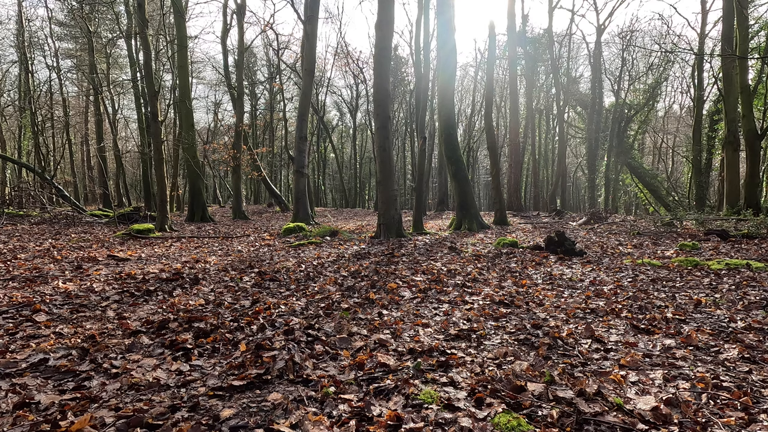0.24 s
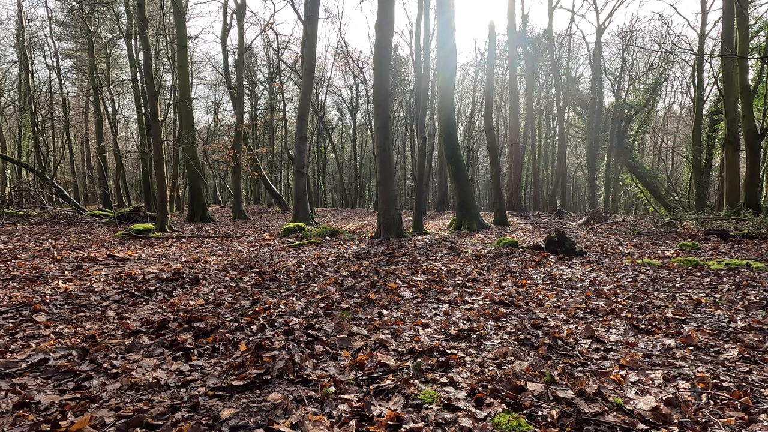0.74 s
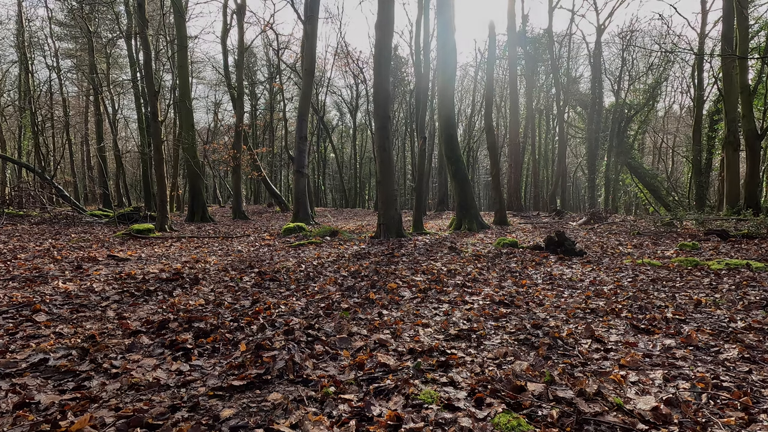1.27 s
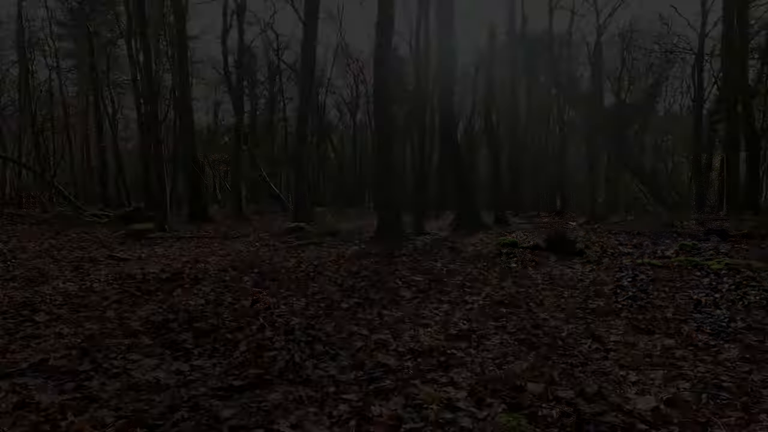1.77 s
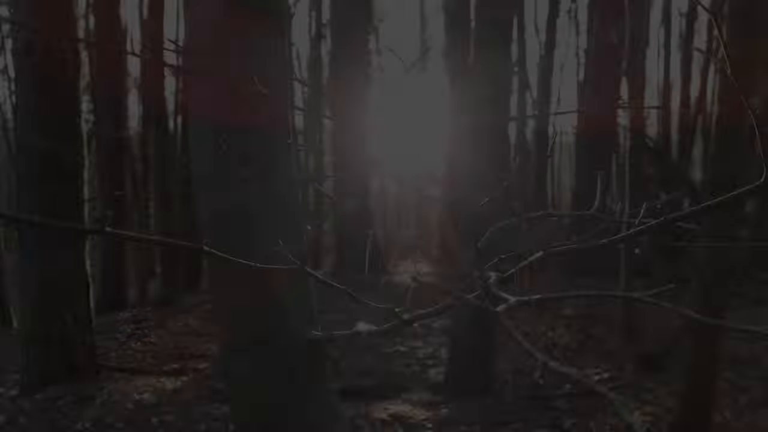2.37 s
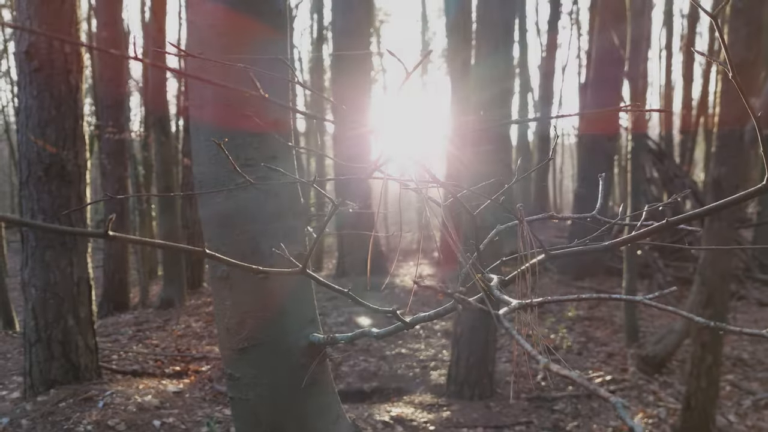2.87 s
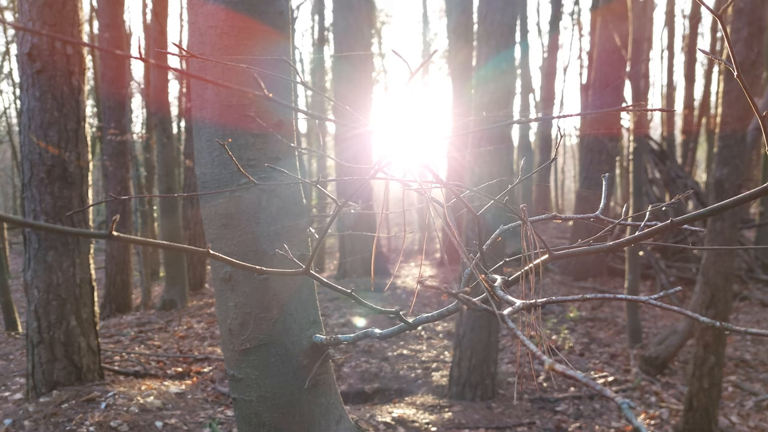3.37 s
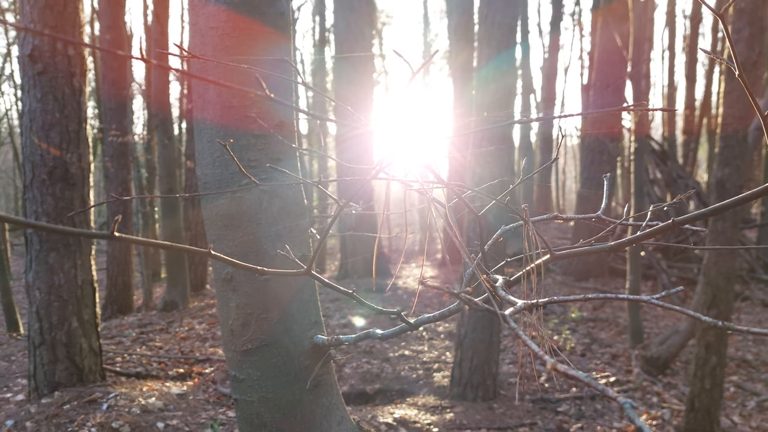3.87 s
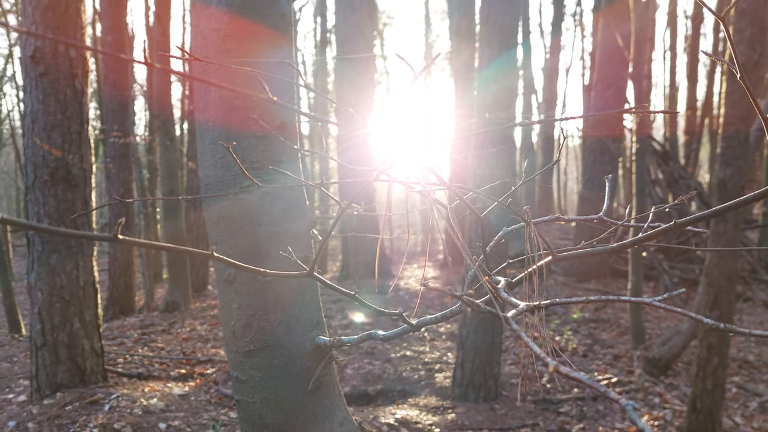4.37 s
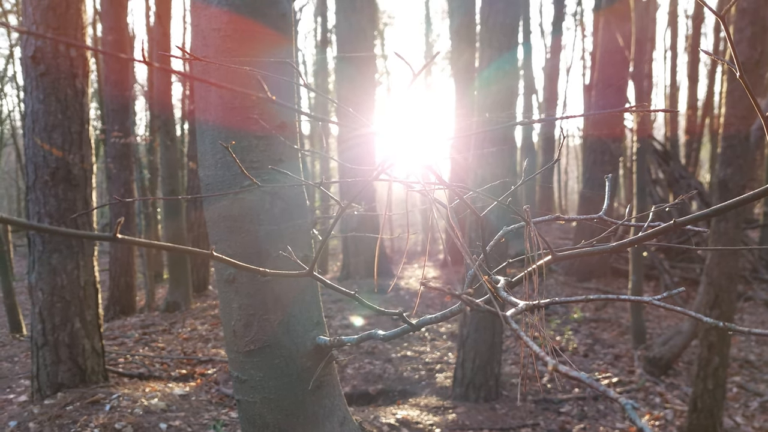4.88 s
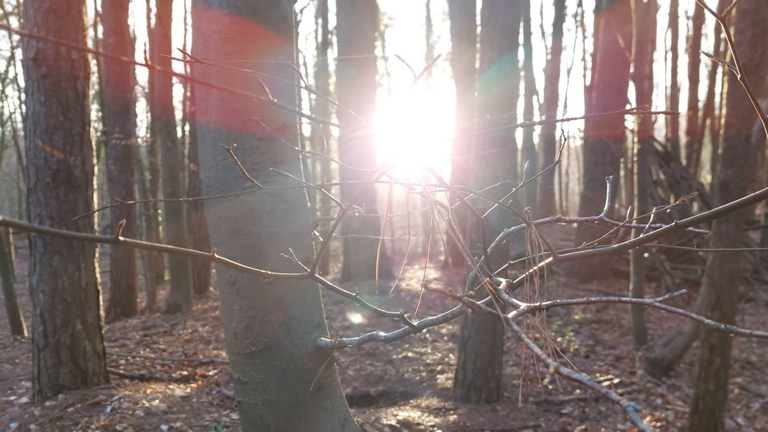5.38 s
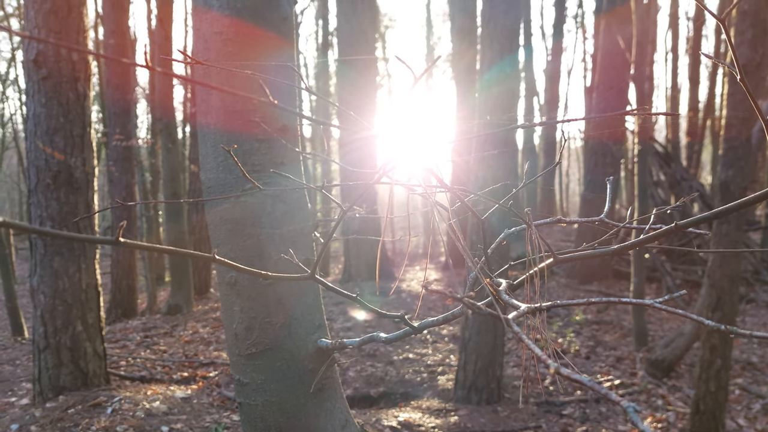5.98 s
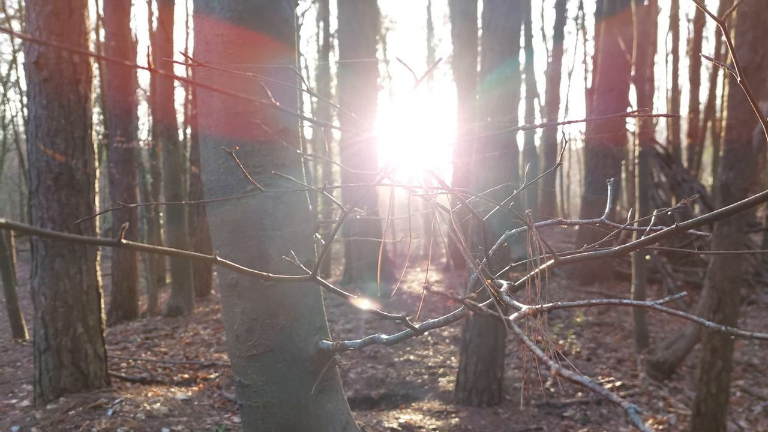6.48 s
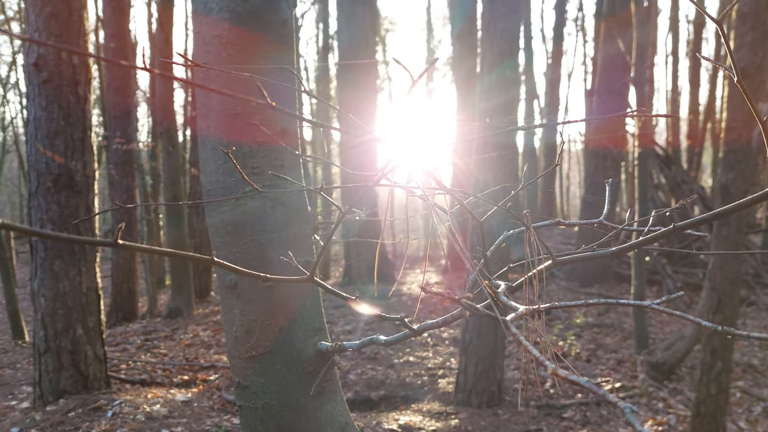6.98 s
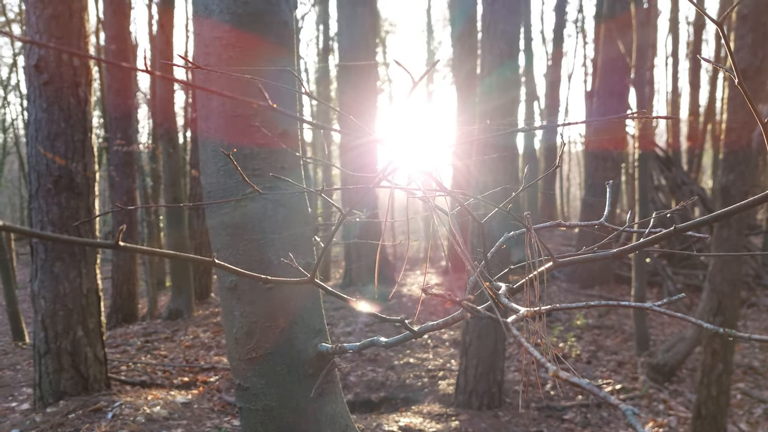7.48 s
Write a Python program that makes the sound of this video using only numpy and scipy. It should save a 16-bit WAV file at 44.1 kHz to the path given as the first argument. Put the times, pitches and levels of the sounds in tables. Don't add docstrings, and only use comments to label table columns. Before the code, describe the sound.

In a bare wood, a small bird scolds with a buzzy churr over a deep distant rumble. The rumble dissolves into a quieter, hissy spot where blurred far song, thin whistles and a repeated plunging trill echo off trunks. A fainter trill answers from the left. Dry leaves tick on the right, then crackle around a soft thud before the near trill returns. Wind hums faintly on the microphone.

```python
import sys
import numpy as np
from scipy import signal
from scipy.io import wavfile
from scipy.ndimage import uniform_filter1d

SR = 44100
rng = np.random.default_rng(int(sys.argv[2]) if len(sys.argv) > 2 else 0)


def field_ratio(decibels):
    return 10 ** (np.asarray(decibels, dtype=float) / 20)


def generate_wav(signal):
    frames = np.transpose(np.atleast_2d(signal))
    scaled = np.clip(frames, -1, 1) * 32767
    pcm = np.round(scaled).astype(np.int16)
    wavfile.write(sys.argv[1], SR, pcm)


N = 341334

# from_s, to_s
DISSOLVE_S = (1.23, 3.03)
CUT_S, CUT_DB = 7.557, -11.5

# freq_hz, density_db
RUMBLE_SPECTRUM = [(8.8, -74), (15, -12), (86, 4), (150, -12), (194, -11), (306, -22.5), (350, -30.5),
                   (407, -25), (550, -54), (720, -63.5), (1210, -120)]
# first_spot_db, second_spot_db
RUMBLE_DB = (-39.5, -59)
SURGE_DB = 2
WIND_IN_RUMBLE, CALM_DB = 0.3, -60
# time_s, strength_db, turn_to_upper_hum_db
WIND = [(0, -57, -6.5), (.3, -55.5, -10), (.6, -49, 1), (1.72, -47.5, -3), (2, -56, -0.2),
        (3.04, -60.5, -1.5), (4.4, -56.5, 1.9), (4.59, -65, 0.5), (4.9, -61.5, 0), (5.37, -54, 3),
        (5.6, -50, -0.5), (5.82, -52, -3), (6.23, -47.5, 0.5), (6.34, -39.5, -1), (6.47, -47.5, -2.5),
        (6.79, -55, 3.5), (7.33, -53, -3), (7.55, -56, -2)]
# freq_hz, density_db
HUM_SPECTRA = [
    [(40, -120), (70, -21.5), (110, -1), (140, 8), (175, -4), (230, -38), (400, -120)],
    [(100, -120), (170, -33), (225, -5.5), (262, 0), (310, -6), (380, -21), (480, -23), (650, -50.5),
     (1100, -120)],
]
# lower_db, upper_db
HUM_DB = (-2.5, -5)
# first_spot_db, second_spot_db
LOWS_PAN_DB = (-1, 4.5)
# time_s, half_width_s, pan_db
PUSH = (6.38, .18, -12)
LAG_SAMPLES = 13

# freq_hz, density_db
AIR_FIRST = [(220, -12.5), (380, 3), (424, -4), (657, -15.5), (1120, -13), (2190, -21.5), (3180, -21),
             (5940, -26), (7280, -24), (10800, -47), (11800, -43), (12800, -56), (15900, -62)]
AIR_SECOND = [(190, -41), (330, -5.5), (435, -6.5), (832, -9), (1190, -14.5), (1370, -19), (2460, -22.5),
              (2950, -23.5), (5910, -30.5), (7540, -29.5), (10400, -33), (15100, -29.5), (15900, -34)]
# freq_hz, correlation
SAME_FIRST = [(60, 0.7), (240, 1), (950, 0.28), (3770, 0.38), (15000, 0.9)]
SAME_SECOND = [(60, 0.75), (180, 0.81), (550, 0.23), (1650, -0.35), (4970, 0.086), (15000, -0.12)]
# freq_hz, pan_db
LEAN_FIRST = [(60, 11.5), (240, -2), (950, -3), (3770, 2), (15000, 12)]
LEAN_SECOND = [(60, 3), (180, 7.5), (550, -2), (1650, -2.5), (4970, -0.5), (15000, -3.5)]
FIRST_DB, SECOND_DB = -65, -65

# start_s, length_s, from_hz, to_hz, level_db
SONG_NEAR = [
    (0.001, 1, 7300, 7220, -86),
    (1.319, 0.47, 4203, 4255, -74),
    (1.375, .13, 3700, 3660, -73.5),
    (1.48, 0.33, 4570, 4560, -72),
    (1.621, 0.17, 7100, 7320, -83),
    (4.92, .12, 5200, 5150, -84),
    (5.053, 0.09, 2560, 2400, -76),
    (5.135, .07, 2230, 2020, -77),
    (5.17, 0.15, 4600, 4540, -86),
    (5.25, 0.13, 2000, 1970, -80),
]
SONG_MID = [(0.957, 0.33, 7840, 7420, -78), (1.55, 0.36, 3700, 3450, -79), (2.296, 0.5, 3084, 2995, -78.5),
            (2.37, .05, 7950, 7850, -74), (2.5, .1, 7900, 7850, -85), (3.16, 0.26, 3120, 2964, -69),
            (3.502, 0.59, 2850, 2730, -81), (3.548, 0.31, 7460, 7600, -73.5), (3.755, 0.2, 5060, 4860, -74),
            (3.895, 0.13, 4250, 4080, -62.5), (4.085, 0.2, 4850, 4880, -65), (4.31, 0.12, 4050, 3950, -67),
            (4.44, .1, 4050, 4100, -72), (3.82, .09, 3400, 3850, -70), (6.66, 0.1, 3646, 3630, -74),
            (6.74, 0.22, 3646, 3600, -70), (6.645, 0.38, 4230, 4155, -74)]
SONG_DEEP = [(1.4, .45, 4100, 4100, -75.5), (2.364, 0.045, 7900, 7600, -73), (4.389, 0.32, 4500, 4100, -72),
             (4.72, .45, 3800, 2900, -76), (4.89, 0.11, 7600, 7000, -73), (5.312, 0.075, 7800, 7100, -77.5),
             (6.605, 0.02, 6100, 5800, -74), (4.3, .3, 5400, 5100, -78), (4.6, .18, 3400, 3300, -77),
             (3.6, .7, 5400, 5400, -77)]
# near_hz, mid_hz, deep_hz
BLUR_HZ = (75, 322.7, 893)

# start_s, length_s, top_pulse_rate_hz, level_db
CHURR_NOTES = [
    [(0.014, 0.032, 522, -59), (0.066, 0.026, 517, -60.5), (0.113, 0.028, 537, -61.5),
     (0.162, 0.026, 509, -60.5), (0.209, 0.035, 511, -62.5), (0.272, 0.044, 550, -60)],
    [(0.361, 0.062, 459, -60), (0.474, .056, 479, -59), (0.582, 0.063, 468, -59.5),
     (0.699, 0.053, 466.5, -59.5), (0.813, 0.06, 464, -60)],
]
# start_rate_hz, throat_hz, upper_group_db, throat_ride_0_1, end_over_top_rate, jitter
CHURR_VOICES = [
    (355, 4000, -30, .7, .9, .008),
    (378.7, 4620, -13, 1, .8, .0015),
]
CHURR_PARTIALS = [5.3, 6, 7, 8, 9, 10, 11, 12, 13, 14.45]

# start_s, length_s, from_hz, to_hz, level_db
LEFT_NOTES = [(0.107, 0.032, 4460, 4340, -73), (0.33, 0.054, 7350, 7300, -85),
              (.385, 0.11, 7450, 7430, -84), (.552, .03, 7450, 7350, -80), (.678, .02, 7400, 7300, -83),
              (.76, 0.063, 7400, 7450, -83), (0.712, 0.033, 7500, 7400, -77),
              (.865, 0.115, 7530, 7450, -80.5), (1.295, 0.078, 3950, 3830, -76),
              (2.329, 0.062, 2690, 3280, -84), (2.398, 0.022, 3260, 2630, -77)]
FRONT_NOTES = [(0.046, 0.034, 4440, 4350, -62), (0.315, 0.047, 4540, 4350, -70),
               (0.553, 0.032, 3360, 3300, -75), (1.932, 0.015, 2950, 2650, -73),
               (1.85, 0.042, 2686, 3320, -80), (2.087, 0.037, 2280, 3580, -79.5),
               (2.125, 0.052, 4510, 4310, -79.5), (2.392, 0.021, 4200, 4380, -77.5),
               (2.654, 0.092, 2945, 2930, -87), (3.433, 0.007, 6260, 8000, -67),
               (3.438, .014, 7800, 8500, -74)]
RIGHT_NOTES = [(3.313, 0.035, 7740, 7450, -84), (3.34, .085, 7430, 7300, -78),
               (4.695, .125, 7500, 7100, -84.5), (4.2, 0.0043, 4600, 3300, -68),
               (4.118, 0.015, 5020, 4800, -63.5), (4.578, .016, 5200, 4730, -79),
               (4.63, 0.013, 5000, 4500, -80), (5.058, 0.086, 2560, 2410, -74),
               (5.135, .1, 2200, 1977, -75.5), (4.201, 0.0048, 2920, 2070, -66.5),
               (4.653, 0.03, 2520, 2470, -81), (4.685, 0.092, 2118, 2072, -72),
               (6.495, 0.13, 2870, 2280, -83), (7.385, 0.041, 2030, 2440, -79.5),
               (7.424, .02, 2410, 2100, -80), (7.65, 0.044, 3230, 2580, -72)]
# left_db, front_db, right_db
SIDES_DB = (7, -4, -16.5)
# start_s, length_s, from_hz, level_db
SEEPS = [
    (3.453, 0.17, 8330, -64),
    (5.605, 0.092, 7900, -75),
    (5.904, 0.068, 7900, -75.5),
    (6.394, 0.12, 8240, -62),
]
SEEP_SAG_HZ_PER_S, SEEP_PAN_DB = 6100, 1
# start_s, level_db, pitch_factor
STROKES = [
    [(4.027, -62.5, 1.04), (4.086, -67.5, 0.98), (4.348, -67.5, 1.02), (4.487, -73, 1), (4.628, -76, .95),
     (4.648, -78, 1.05), (4.676, -77, 0.82), (4.708, -78, 1), (4.74, -78, 1.2), (4.757, -80, 1.1),
     (5.154, -66.5, 0.95)],
    [(4.818, -72, 1), (4.921, -69.5, 0.99), (5.03, -70, 0.92)],
    [(4.764, -75.5, 1.02), (4.867, -67.5, 1.01), (4.97, -69, 0.98), (5.092, -73.5, 1)],
]
# length_s, from_hz, to_hz, pan_db
STROKE_SHAPES = [
    (0.0115, 3450, 3050, -18),
    (0.018, 3450, 2620, -20),
    (0.0172, 2700, 3800, -23),
]

# time_s, peak_db, ring_hz, pan_db
TICKS = [(1.3807, -61.5, 4240, -16), (1.4234, -60.5, 4170, -21), (1.6008, -62, 4340, -15),
         (1.6442, -62, 4550, -5), (1.8675, -70, 4510, -6), (2.363, -56, 4900, -4),
         (2.967, -52.5, 5300, -18), (3.0879, -60.5, 5340, -15), (3.2234, -62, 4090, -9),
         (4.2034, -61, 5000, -12), (5.0654, -62.5, 4480, -12), (5.885, -61, 4200, -2.0),
         (6.099, -59, 6800, -12), (6.612, -60, 5500, -6), (6.784, -55, 7600, 1), (6.8096, -62, 4180, 9),
         (4.2005, -57, 7200, -14)]
# start_s, rise_s, hold_s, fall_s, level_db
RUSTLES = [
    (1.348, .07, .005, 0.089, -74),
    (6.269, 0.033, 0.1, 0.22, -63),
    (6.648, 0.074, 0.19, 0.11, -71),
]
# freq_hz, density_db
RUSTLE_SPECTRUM = [(1000, -27), (2500, -4.5), (3600, -4.5), (4680, 3.5), (7000, 0.5), (8560, -18),
                   (11600, -5.5), (15900, -13.5)]
STIR_EDGE_DB = -16
# peak_db, swing_hz, contact_s, pan_db
THUD = (-36, 640, 0.00105, -24)
THUD_S = 6.3845

# s_from_top, pitch_hz, level_db
HOOK = [(-.026, 5850, -22), (-.02, 5980, -5.5), (-.005, 6640, -3), (0, 6330, -5), (.004, 5204, -2),
        (.008, 4450, 3), (.013, 4137, 3.5), (.026, 3700, 0), (.039, 3450, -2), (.047, 3340, -5),
        (.052, 3270, -26)]
# s_from_top, pitch_hz, level_db
FAR_HOOK = [(-.014, 6650, -17), (-.009, 6700, -3), (0, 6700, 0), (.008, 5600, -1), (.018, 4500, -2.5),
            (.03, 3950, -5), (.048, 3680, -1), (.056, 3650, -20)]
# delay_s, level_db
FAR_ECHO = (0.013, -5.5)
TRILL_S = [
    [3.106, 3.231, 3.349, 3.465, 3.579, 3.696, 3.808, 3.92, 4.038, 4.155, 4.274],
    [5.566, 5.689, 5.805, 5.922, 6.039, 6.156, 6.53],
    [6.825, 6.952, 7.075, 7.191, 7.309, 7.421, 7.535, 7.651],
]
# full_db, first_note_softer_db, settle_notes, pitch_factor, soft_sharpness, pan_db
PHRASES = [
    (-63.5, 12.5, 0.96, 0.98, 0.00065, -6),
    (-78, 10, 1.3, 0.99, 0, 6),
    (-61, 11, 2.42, 0.99, 0.039, -4),
]
SOFT_DB = 6

# time_s, low_band_db, high_band_db
CRACKS = [(6.276, -56, -55), (6.282, -46, -44.5), (6.301, -52, -51.5), (6.307, -40, -43),
          (6.3095, -48, -37.5), (6.314, -44, -56), (6.316, -55, -42), (6.32, -57, -43), (6.3264, -40, -39),
          (6.3305, -54, -43), (6.3393, -52, -43.5), (6.347, -54, -48), (6.3502, -56, -44),
          (6.3571, -53, -49), (6.3653, -54, -47.5), (6.369, -52, -45.5), (6.3761, -58, -49),
          (6.3822, -49, -62), (6.385, -46, -62), (6.3929, -52, -61), (6.398, -55, -46), (6.407, -53, -62),
          (6.413, -62, -55), (6.436, -58, -56), (6.459, -51, -60), (6.4735, -60, -58), (6.5054, -56, -50),
          (6.5112, -56, -46), (6.5154, -58, -53)]
# from_hz, to_hz
CRACK_BANDS = [
    (4000, 7800),
    (9000, 14800),
]
CRACK_T60_S, CRACK_PAN_DB = 0.0064, -22

# freq_hz, t60_s
WOOD_T60 = [(2000, 0.44), (4000, 0.56), (8000, 0.48)]


def evened(x):
    return x / np.sqrt(np.mean(x ** 2) + 1e-20)


def read(points, hz):
    f, value = np.transpose(points)
    return np.interp(np.log(hz + 1), np.log(f + 1), value)


def along(rows, column=1):
    return np.interp(np.arange(N) / SR, [r[0] for r in rows], [r[column] for r in rows])


def add(mix, s, sound, pan_db):
    part = mix[:, max(round(s * SR), 0):][:, :len(sound)]
    part += sound[:part.shape[1]] * field_ratio(np.array([[pan_db / 2], [-pan_db / 2]]))


def wobble(size, per_s):
    knots = rng.standard_normal(size * 400 // SR + 3)
    return np.interp(np.arange(size) / SR * min(per_s, 399), np.arange(len(knots)), knots)


def noise(spectrum, same, lean=((1, 0), (2, 0)), patchy_db=1.5, size=1024):
    frames, hz = N * 4 // size + 5, np.fft.rfftfreq(size, 1 / SR)
    a, b, c, d, patches = rng.standard_normal((frames, len(hz), 5)).T
    patches = uniform_filter1d(patches, size=6, axis=0)
    patches = evened(uniform_filter1d(patches, size=10, axis=1))
    same = np.clip(read(same, hz), -1, 1)[:, None]
    left = a + 1j * b
    right = same * left + np.sqrt(1 - same ** 2) * (c + 1j * d)
    tilt_db = read(lean, hz)[:, None] / 2
    level_db = read(spectrum, hz)[:, None] + patchy_db * patches
    z = np.array([left, right]) * field_ratio(level_db + np.array([tilt_db, -tilt_db]))
    return evened(signal.istft(z, nperseg=size, noverlap=size * 3 // 4)[1][:, :N])


def sing(hz, level_db, flutter_db):
    strength = np.sqrt(2) * field_ratio(level_db + flutter_db * wobble(len(hz), 268))
    return strength * np.sin(2 * np.pi * np.cumsum(hz) / SR)


def second_spot():
    return np.interp(np.arange(N) / SR, DISSOLVE_S, [0, 1])


def cut():
    return field_ratio(CUT_DB * np.clip((np.arange(N) / SR - CUT_S) / 0.0098, 0, 1))


def lows():
    second, wind_db, turn_db = second_spot(), along(WIND), along(WIND, column=2)
    deep = field_ratio(RUMBLE_DB[0] + SURGE_DB * wobble(N, 6.93)) * (1 - second) ** 1.85
    deep = deep + second * field_ratio(RUMBLE_DB[1] + WIND_IN_RUMBLE * (wind_db - CALM_DB))
    out = deep * noise(RUMBLE_SPECTRUM, [(90, 0.98), (300, 0.8)], patchy_db=2.0, size=4096)
    for spectrum, hum_db, way in zip(HUM_SPECTRA, HUM_DB, (-1, 1)):
        strength = field_ratio(wind_db + hum_db + way * turn_db + 2.72 * wobble(N, 14))
        out += strength * noise(spectrum, [(100, 0.81), (300, 0.81)], patchy_db=1.5, size=2048)
    share = np.clip(2 * second - 1, 0, 1)
    out[1] = (1 - share) * out[1] + share * np.roll(out[1], LAG_SAMPLES)
    at, half_width, push_db = PUSH
    push = np.maximum(1 - abs(np.arange(N) / SR - at) / half_width, 0)
    pan_db = LOWS_PAN_DB[0] + (LOWS_PAN_DB[1] - LOWS_PAN_DB[0]) * share + push_db * push
    return cut() * out * field_ratio(pan_db / 2 * np.array([[1], [-1]]))


def air():
    second = second_spot()
    first = field_ratio(FIRST_DB) * (1 - second) * noise(AIR_FIRST, SAME_FIRST, LEAN_FIRST, patchy_db=1.0)
    later = noise(AIR_SECOND, SAME_SECOND, LEAN_SECOND, patchy_db=1.65)
    return first + field_ratio(SECOND_DB) * second * cut() * later


def far_song():
    out = np.zeros((2, N))
    depths = zip((SONG_NEAR, SONG_MID, SONG_DEEP), BLUR_HZ)
    rows = [(*row, blur_hz) for depth, blur_hz in depths for row in depth]
    for at, length, from_hz, to_hz, level_db, blur_hz in rows:
        u = np.linspace(0, 1, round(length * SR))
        r = np.exp(-np.pi * blur_hz * 1.5 / SR)
        paths = rng.standard_normal((len(u), 2)) @ [1, 1j]
        spread = signal.lfilter([1], [1, -2 * r, r * r], paths)
        glide = from_hz + (to_hz - from_hz) * u
        haze = evened((spread * np.exp(2j * np.pi * np.cumsum(glide) / SR)).real)
        syllables = np.maximum(wobble(len(u), 55), 0)
        wavering = glide + .8 * blur_hz * wobble(len(u), 60)
        warble = evened(syllables * np.sin(2 * np.pi * np.cumsum(wavering) / SR))
        line = .9 * haze + .4 * warble
        envelope = np.sin(np.pi * u ** 0.38) ** 0.26
        add(out, at, field_ratio(level_db + 2.8 * wobble(len(u), 46)) * line * envelope, -3.0)
    return out


def churr():
    out, k = np.zeros((2, N)), np.array(CHURR_PARTIALS)[:, None]
    notes = [(*row, *voice) for rows, voice in zip(CHURR_NOTES, CHURR_VOICES) for row in rows]
    for at, length, top_hz, level_db, from_hz, throat_hz, upper_db, ride, end, jitter in notes:
        u = np.linspace(0, 1, round(length * SR))
        arch_hz = [from_hz, from_hz + .62 * (top_hz - from_hz), top_hz, .985 * top_hz, end * top_hz]
        rate = np.interp(u, [0, .35, .68, .8, 1], arch_hz)
        rate = rate * (1 + jitter * wobble(len(u), 250))
        away = (k * (rate + ride * (top_hz - rate)) - throat_hz) / top_hz
        throat = np.exp(-(away / 1.3) ** 4) * field_ratio(-2.5 * away)
        upper = field_ratio(upper_db) * np.exp(-((away - 4.6) / 1.6) ** 2)
        colour = throat + upper + field_ratio(-18)
        cycles = np.cumsum(k * rate, axis=1) / SR + rng.random(k.shape)
        stack = (colour * np.sin(2 * np.pi * cycles)).sum(0)
        envelope = np.sin(np.pi * u ** 1.6) ** 0.62
        add(out, at, field_ratio(level_db + 1.9 * wobble(len(u), 220)) * evened(stack) * envelope, -2.5)
    return out


def whistle_notes():
    sides = zip((LEFT_NOTES, FRONT_NOTES, RIGHT_NOTES), SIDES_DB)
    rows = [(*row, pan_db) for side, pan_db in sides for row in side]
    for at, length, hz, level_db in SEEPS:
        rows.append((at, length, hz, hz - SEEP_SAG_HZ_PER_S * length, level_db, SEEP_PAN_DB))
    for kind, (length, from_hz, to_hz, pan_db) in zip(STROKES, STROKE_SHAPES):
        rows += [(at, length, pitch * from_hz, pitch * to_hz, db, pan_db) for at, db, pitch in kind]
    return rows


def whistles():
    out = np.zeros((2, N))
    for at, length, from_hz, to_hz, level_db, pan_db in whistle_notes():
        u = np.linspace(0, 1, round(length * SR))
        note = sing(from_hz + (to_hz - from_hz) * u, level_db, flutter_db=3.0)
        add(out, at, note * np.sin(np.pi * u) ** 0.5, pan_db)
    return out


def ticks():
    out, t = np.zeros((2, N)), np.arange(2000) / SR
    thin = signal.butter(4, [3600, 15500], "bandpass", fs=SR, output="sos")
    for at, peak_db, hz, pan_db in TICKS:
        snap = field_ratio(-60 * t / .0025) * (np.sin(2 * np.pi * hz * t) + rng.standard_normal(len(t)))
        add(out, at, field_ratio(peak_db - 1.5) * signal.sosfilt(thin, snap), pan_db)
    return out


def rustle():
    out = np.zeros((2, N))
    lean = [(3000, -9), (8000, -9), (15000, -18)]
    hiss = noise(RUSTLE_SPECTRUM, [(1, .3), (2, .3)], lean, patchy_db=.8, size=256)
    body = signal.sosfiltfilt(signal.butter(4, 8200, fs=SR, output="sos"), hiss)
    grain_sizes = field_ratio(3.5 * np.minimum(rng.exponential(1, N), 2.5))
    grains = grain_sizes * (rng.random(N) < 500 / SR)
    ringing = signal.lfilter([1], [1, -.95], grains)
    crackle = evened(2.5 + evened(uniform_filter1d(ringing, size=30)))
    for at, rise, hold, fall, level_db in RUSTLES:
        s = np.arange(N) / SR - at
        away = np.maximum(np.maximum(1 - s / rise, (s - rise - hold) / fall), 0)
        fullness = field_ratio(.5 * (level_db + 59))
        strength = field_ratio(level_db + STIR_EDGE_DB * away ** 0.63 + 5.5) * (away < 1)
        out += strength * crackle * (hiss - body + fullness * body)
    return out


def trill_notes():
    for times, (full_db, build_db, settle, pitch, sharp, pan_db) in zip(TRILL_S, PHRASES):
        for k, at in enumerate(times):
            soft_db = build_db * np.exp(-k / settle)
            yield at, full_db - soft_db, min(pitch + sharp * soft_db / SOFT_DB, 1.03), pan_db


def trill():
    out = np.zeros((2, N))
    for at, level_db, pitch, pan_db in trill_notes():
        far = pan_db > 0
        s, hz, db = np.transpose(FAR_HOOK if far else HOOK)
        t = np.arange(s[0], s[-1], 1 / SR)
        glide = pitch * np.interp(t, s, hz)
        strength_db = level_db + 1.5 + np.interp(t, s, db)
        if far:
            delay, echo_db = FAR_ECHO
            add(out, at + s[0] + delay, sing(glide, strength_db + echo_db, flutter_db=4.5), pan_db)
        else:
            strength_db = strength_db + 3 * np.clip(level_db + 65.5, -4, 0) * np.clip(-t / .012, 0, 1)
        glide = glide * (1 + 0.003 * rng.standard_normal())
        note = sing(glide, strength_db + 1.2 * wobble(len(t), 41.3), flutter_db=2.5)
        add(out, at + s[0], note, pan_db)
    return out


def cracks():
    out, t = np.zeros((2, N)), np.arange(600) / SR
    bands = [signal.butter(3, band, "bandpass", fs=SR, output="sos") for band in CRACK_BANDS]
    for at, *levels_db in CRACKS:
        for band, db in zip(bands, levels_db):
            burst = signal.sosfilt(band, rng.standard_normal(len(t)) * field_ratio(-60 * t / CRACK_T60_S))
            add(out, at, field_ratio(db - 8.0) * burst / abs(burst).max(), CRACK_PAN_DB)
    return out


def thud():
    out, t = np.zeros((2, N)), np.arange(2000) / SR
    peak_db, hz, contact, pan_db = THUD
    knock = np.exp(-(t / contact - 3) ** 2) * np.sin(2 * np.pi * hz * (t - 3 * contact))
    band = signal.butter(2, [450, 1500], "bandpass", fs=SR, output="sos")
    litter = signal.sosfilt(band, rng.standard_normal(len(t)))
    knock = knock + field_ratio(-21.5) * litter * np.sin(np.pi * t / t[-1]) ** 2
    add(out, THUD_S, field_ratio(peak_db) * knock, pan_db)
    return out


def wood(x):
    taps = np.zeros((2, SR))
    at = np.arange(300, SR - 20, 20) + rng.integers(0, 20, (2, (SR - 301) // 20))
    np.put_along_axis(taps, at, rng.choice([-1., 1.], at.shape), 1)
    hz, t, z = signal.stft(taps, SR, nperseg=256)
    decay = field_ratio(-60 * t / read(WOOD_T60, hz)[:, None])
    tail = signal.istft(z * decay, SR, nperseg=256)[1]
    shared = signal.fftconvolve(x, tail / np.linalg.norm(tail[0]), axes=1)[:, :N]
    return shared + 0.15 * shared[::-1]


def near_trunks(x):
    first = field_ratio(-14.0) * np.roll(x, round(.008 * SR), axis=1)
    crossed = field_ratio(-9.5) * np.roll(x[::-1], round(.015 * SR), axis=1)
    return x + first + crossed


def scene():
    background = lows() + air()
    far, scold, other, near = far_song(), churr(), whistles(), near_trunks(trill())
    echoes = wood(field_ratio(-4) * near + field_ratio(-4.0) * scold + field_ratio(-2) * other + field_ratio(-1.5) * far)
    birds = near + scold + other + field_ratio(-4.0) * far + echoes
    return background + birds + ticks() + rustle() + cracks() + thud()


def band_limit(x):
    return signal.sosfilt(signal.butter(12, 16050, fs=SR, output="sos"), x)


def record(dry):
    fade = np.minimum(np.arange(N) / 60, 1) ** 2
    return band_limit(dry * fade)


dry = scene()
out = record(dry)
generate_wav(out)
```